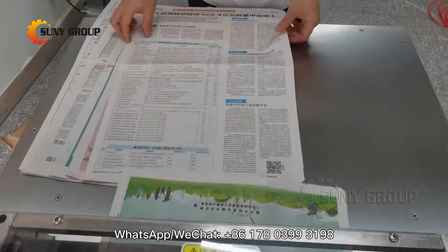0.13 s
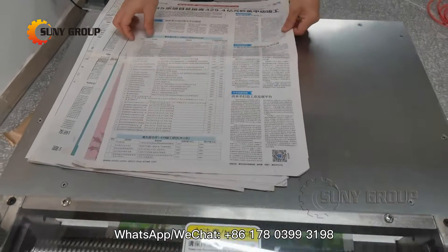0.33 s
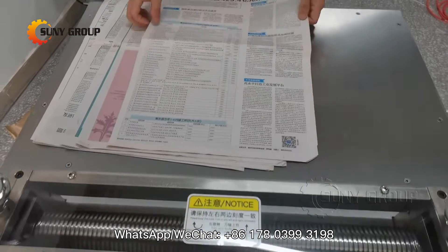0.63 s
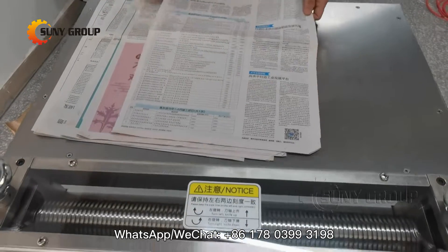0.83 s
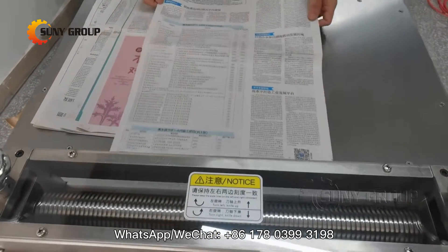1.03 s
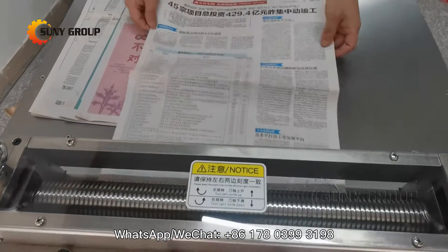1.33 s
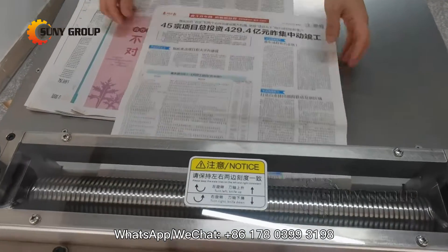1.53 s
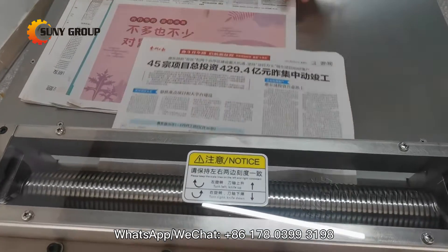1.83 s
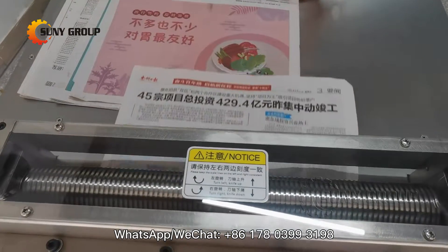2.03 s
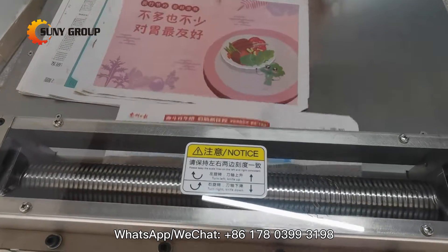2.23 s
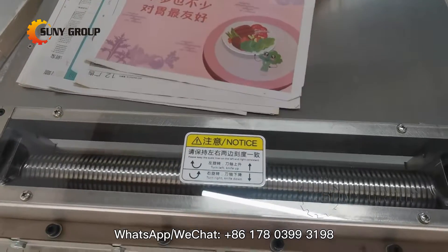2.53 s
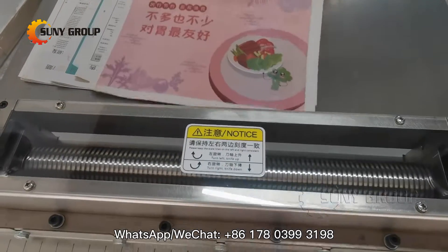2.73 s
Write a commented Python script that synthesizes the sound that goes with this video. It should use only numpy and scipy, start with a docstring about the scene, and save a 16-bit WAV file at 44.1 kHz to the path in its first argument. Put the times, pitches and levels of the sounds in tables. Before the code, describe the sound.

Close stereo pickup of an electric shredder indoors, with steady low drone, gear roar and dull frame thuds; paper rips in a gritty rush, pauses, then rips again, with a few sharp paper snaps.

```python
"""A wide paper shredder runs close by in a workshop, heard by two microphone ports.
The motor hum, a sine at twice the mains frequency, swells within 0.2 s and stays uneven; tones whine beside it.
Tearing, a mix of ticks and hiss, runs to 0.65 s, returns near 1.4 s and fades after 2.7 s; noise bursts snap
near 0.4, 0.8, 2.0 and 2.8 s. Throughout, noise rumbles and thuds in the frame's resonances, shaped noise roars
from the running gear, and a fuzzy sine squeaks faintly in the rollers."""
import sys
import numpy as np
from scipy import signal
from scipy.fft import rfft, irfft, next_fast_len
from scipy.io import wavfile
from scipy.ndimage import uniform_filter1d, map_coordinates

SR = 44100
rng = np.random.default_rng(int(sys.argv[2]) if len(sys.argv) > 2 else 0)


def transcribe(signal):
    """Save signal, clipped to [-1, 1], as a 16-bit WAV file at the path in sys.argv[1]."""
    frames = np.atleast_2d(signal).T
    limited = np.clip(frames, -1, 1)
    pcm = np.round(limited * 32767).astype(np.int16)
    wavfile.write(sys.argv[1], SR, pcm)


N = 127890
T_S = np.arange(N) / SR


def amp(db):
    """dB to gain."""
    return 10 ** (np.asarray(db) / 20)


def unit(x):
    """Scaled to rms 1."""
    return x / np.sqrt(np.mean(x ** 2) + 1e-20)


def along(points, hz):
    """Interpolates (Hz, value) points on a log frequency axis."""
    f, v = np.transpose(points)
    return np.interp(np.log(hz + 1), np.log(f + 1), v)


def curves(rows):
    """One value per sample for each column after the time."""
    s, *cols = np.transpose(rows)
    return [np.interp(T_S, s, c) for c in cols]


def wobble(knots_per_s):
    """A smooth random curve through normal-distributed knots."""
    knots = rng.standard_normal(int(N * knots_per_s / SR) + 4)
    return map_coordinates(knots, [np.arange(N) * knots_per_s / SR])


def filtered(x, response):
    """x times a complex response of frequency, zero-padded against wrap-around."""
    m = next_fast_len(N + SR // 2)
    hz = np.fft.rfftfreq(m, 1 / SR)
    return irfft(rfft(x, m) * response(hz), m)[..., :N]


def resonances(table):
    """Response of (Hz, width Hz, dB) resonances; dB is the rms each passes from unit noise."""
    def response(f):
        total = 0
        for k, (centre_hz, width_hz, db) in enumerate(table):
            gain = amp(db) * np.sqrt(SR / (np.pi * width_hz))
            damping = 1j * f * width_hz
            # alternating signs
            total = total + (-1) ** k * gain * damping / (centre_hz ** 2 - f * f + damping)
        return total
    return response


# Left-right likeness of the noise. Each row: frequency in Hz, correlation (0 to 1).
LIKENESS = [(60, 1), (130, 0.97), (290, 0.93), (500, 0.8), (800, 0.63), (1200, 0.0073), (1600, 0.025),
            (15000, 0)]


def spread(pair, response):
    """Two unrelated signals coloured and mixed to a left-right pair, alike in the bass."""
    def mid_side(hz):
        turn = np.arccos(np.clip(along(LIKENESS, hz), -1, 1)) / 2
        return response(hz) * np.array([np.cos(turn), np.sin(turn)])
    mid, side = filtered(pair, mid_side)
    return np.array([mid + side, mid - side])


def patchy(depth_db):
    """Two noises whose gain varies randomly in shared patches of time and frequency."""
    z = signal.stft(rng.standard_normal((2, N)), nperseg=512)[2]
    field = uniform_filter1d(rng.standard_normal(z.shape[1:]), size=3, axis=0)
    field = uniform_filter1d(field, size=12, axis=1)
    return unit(signal.istft(z * amp(depth_db * unit(field)), nperseg=512)[1][:, :N])


# Motor hum. Each row: time in seconds, rms level in dB before smoothing.
HUM_LEVEL = [(0.0, -32), (0.03, -15), (0.16, -11.5), (0.25, -14.5), (0.7, -14.5), (0.8, -18), (0.83, -14.5),
             (0.88, -19.5), (0.93, -13), (0.96, -18), (1.03, -17), (1.06, -26), (1.09, -16.5),
             (1.39, -14.5), (1.42, -25), (1.44, -19), (1.63, -10.5), (1.75, -17.5), (1.85, -13),
             (1.89, -19.5), (1.92, -12.5), (1.98, -16.5), (2.03, -10), (2.07, -14.5), (2.1, -11),
             (2.16, -14), (2.56, -12.5), (2.75, -18), (2.88, -12)]
# Hum flutter: narrow noise bands beside the hum.
# Each row: frequency in Hz, width in Hz, level in dB before narrowing.
HUM_FLUTTER = [(93.9, 6.3, -32), (116.46, 16.2, -29.5), (131.7, 2.7, -42)]
# Shaft, mains and gear tones. Each row: frequency in Hz, mean rms level in dB.
WHINE_TONES = [(42.5, -37.5), (57.5, -40.5), (200, -40.5), (242.4, -52.5), (484.8, -43.5), (678, -53),
               (729, -55), (969, -58)]
HUM_HZ, HUM_START_RAD, HUM_SMOOTH_SAMPLES = 99.96, 4.6, 900
WHINE_SWAY_DB, WHINE_SWAY_S = 1.5, .00025  # level, timing


def motor():
    """A sine hum of uneven level flutters with narrow noise beside it; shaft and gear tones sway."""
    level = amp(uniform_filter1d(curves(HUM_LEVEL)[0], size=HUM_SMOOTH_SAMPLES))
    hum = np.sqrt(2) * level * np.sin(2 * np.pi * HUM_HZ * T_S + HUM_START_RAD)

    def steep(f):
        total = 0
        for centre_hz, width_hz, db in HUM_FLUTTER:
            damping = 2j * f * width_hz  # second stage, twice as wide, steepens the skirts
            second = damping / (centre_hz ** 2 - f * f + damping)
            total = total + resonances([(centre_hz, width_hz, db)])(f) * second
        return total

    flutter = unit(level) * filtered(rng.standard_normal(N), steep)
    whine = np.zeros(N)
    for hz, db in WHINE_TONES:
        gain = np.sqrt(2) * amp(db + WHINE_SWAY_DB * wobble(5.74))
        swayed_s = T_S + WHINE_SWAY_S * wobble(12)
        whine += gain * np.sin(2 * np.pi * hz * swayed_s + rng.uniform(0, 2 * np.pi))
    return hum + flutter + whine


# Tearing while a sheet is in the cutters. Each row: time in seconds, level in dB before TEAR_LIFT_DB.
SHEET_LEVEL = [(0, -38.5), (.09, -39.5), (.33, -39.5), (.38, -37.5), (.46, -36.5), (.49, -39), (.63, -39.5),
               (.665, -45), (.73, -54), (1.32, -54), (1.36, -43), (1.39, -38.5), (1.43, -37.5), (1.52, -40),
               (1.8, -38.5), (1.95, -38), (2.3, -38), (2.63, -39), (2.69, -39), (2.72, -48), (2.79, -47),
               (2.88, -52)]
# Tearing colour. Each row: frequency in Hz, relative density in dB per Hz before the bass cut.
TEAR_COLOUR = [(410, -26), (700, 8.5), (767, -2), (840, -1.5), (908, -1.5), (957, -2.5), (1590, -10),
               (1860, -9.5), (2780, -12), (3700, -10), (5840, -11.5), (7670, -15.5), (9830, -23),
               (12600, -16.5), (15700, -17.5)]
FIBRES_PER_S, FIBRE_SPREAD_DB, FIBRE_POWER_SHARE = 8000, 3, .4
TEAR_LIFT_DB, TEAR_SWAY_DB, BASS_CUT_HZ = 3.5, .25, 900


def cutters():
    """Fibres part in a dense hail of tiny ticks mixed with hiss."""
    size = amp(FIBRE_SPREAD_DB * rng.standard_normal((2, N))) * rng.choice([-1, 1], size=(2, N))
    ticks = unit(size * (rng.random((2, N)) < FIBRES_PER_S / SR))
    hiss = patchy(depth_db=2.0)
    source = np.sqrt(FIBRE_POWER_SHARE) * ticks + np.sqrt(1 - FIBRE_POWER_SHARE) * hiss

    def colour(hz):
        bass_cut = hz ** 2 / (hz ** 2 + BASS_CUT_HZ ** 2)
        return amp(along(TEAR_COLOUR, hz)) * bass_cut

    tear = unit(spread(source, colour))
    return amp(curves(SHEET_LEVEL)[0] + TEAR_LIFT_DB + TEAR_SWAY_DB * wobble(16)) * tear


# Paper snaps. Each row: start in seconds, level in dB before SNAP_LIFT_DB and the rise, brightness in dB.
PAPER_SNAPS = [(.3782, -26, -3), (.3905, -26, -5), (.4408, -30, -3), (.779, -38, -4), (1.99, -33, -12),
               (2.008, -32, 3), (2.0364, -32, -8), (2.045, -33, -6), (2.7916, -38, -6)]
# Sheet resonances. Each row: frequency in Hz, width in Hz, relative level in dB.
SHEET_RESONANCES = [(1310, 490, -4), (2150, 840, 5.5), (3350, 580, -2.5), (5830, 1300, -5)]
SNAP_T60_S, SNAP_RISE_S, SNAP_LIFT_DB = .016, .0006, 2


def snaps():
    """Creases snap: short noise bursts in the sheet's resonances, the top one set by brightness."""
    dull = unit(spread(rng.standard_normal((2, N)), resonances(SHEET_RESONANCES[:-1])))
    bright = unit(spread(rng.standard_normal((2, N)), resonances(SHEET_RESONANCES[-1:])))
    out = np.zeros((2, N))
    for start_s, db, bright_db in PAPER_SNAPS:
        u = np.clip(T_S - start_s, 0, 1)
        decay = amp(db + SNAP_LIFT_DB - 60 * u / SNAP_T60_S)
        rise = 1 - np.exp(-u / SNAP_RISE_S)
        out += decay * rise * (dull + amp(bright_db) * bright)
    return out


CASING_DB, CASING_SPACING_HZ = 1.5, 50


def casing():
    """Many small casing resonances: a fine uneven response, different at each port."""
    knots = rng.standard_normal((2, int(SR / 2 / CASING_SPACING_HZ) + 4))

    def response(hz):
        ripple = np.array([map_coordinates(k, [hz / CASING_SPACING_HZ]) for k in knots])
        return amp(CASING_DB * ripple)
    return response


# Steel frame resonances. Each row: frequency in Hz, width in Hz, rms level in dB without jolts.
FRAME_RESONANCES = [(72.5, 13, -38.5), (148, 7.5, -44), (160.5, 7.1, -37), (216, 23, -42),
                    (268.3, 8.5, -43.5), (284.4, 11, -44.5), (307, 8.6, -49.5), (352.3, 15.6, -46),
                    (421.2, 13.5, -43), (441, 40, -46), (520, 47, -49), (623, 9.5, -51.5),
                    (703, 110, -51.5), (827, 80, -55.5), (1174, 43, -64.5), (1308, 45, -57),
                    (1463, 25, -57.5)]
# Frame jolts. Each row: start in seconds, nominal strength in dB over the rumble.
FRAME_JOLTS = [(.14, 5), (0.432, 10.5), (.47, 2), (.56, 3.5), (.65, 4.5), (.73, 5), (0.841, 9), (0.948, 13),
               (1.58, 9.5), (1.89, 6.5), (2.03, 6.5), (2.31, 7.5), (2.52, 7), (2.79, 10.5)]
THUD_RISE_S, THUD_FALL_S = .01, .045
JOLT_HZ = 352  # jolts reach mainly the lower resonances


def frame():
    """Noise shakes the frame's resonances, harder at each jolt."""
    jolts = np.zeros(N)
    for start_s, db in FRAME_JOLTS:
        u = np.clip(T_S - start_s, 0, None)
        pulse = 2 * (1 - np.exp(-u / THUD_RISE_S)) * np.exp(-u / THUD_FALL_S)
        jolts += (amp(db) - 1) * pulse
    shake = patchy(depth_db=2.5)
    shake = shake + filtered(jolts * shake, lambda hz: 1 / (1 + (hz / JOLT_HZ) ** 2))
    return spread(shake, resonances(FRAME_RESONANCES))


# Running gear colour. Each row: frequency in Hz, relative density in dB per Hz.
GEAR_COLOUR = [(30, -25), (48, -6), (70, -17.5), (100, -12.5), (130, -14), (160, -22), (325, -24),
               (480, -21), (680, -33), (1030, -32), (1500, -36), (2100, -38), (3000, -43.5), (3700, -39.5),
               (4800, -51), (6000, -44.5), (7500, -54.5), (9800, -57.5), (12500, -50.5), (15700, -53)]
GEAR_DB = -35


def running_gear():
    """A broad roar: patchy noise shaped to the gear's spectrum."""
    roar = unit(spread(patchy(depth_db=.8), lambda hz: amp(along(GEAR_COLOUR, hz))))
    return amp(GEAR_DB) * roar


# Roller squeak. Each row: time in seconds, frequency in Hz, level in dB before the fuzz.
ROLLER_SQUEAK = [(0, 11500, -64), (.7, 11500, -66), (.82, 11500, -58), (.85, 11550, -59), (.87, 12100, -58),
                 (.91, 12150, -55), (.95, 11800, -56), (1.02, 11450, -57), (1.12, 11500, -65),
                 (1.3, 11500, -60), (2, 11500, -60), (2.35, 11500, -53), (2.7, 11500, -62),
                 (2.9, 11500, -56)]
FUZZ_KNOTS_PER_S = 300


def rollers():
    """A faint, very high sine squeak, made fuzzy by random gain at each port."""
    hz, db = curves(ROLLER_SQUEAK)
    fuzz = np.array([wobble(FUZZ_KNOTS_PER_S), wobble(FUZZ_KNOTS_PER_S)])
    return amp(db) * fuzz * np.sin(2 * np.pi * np.cumsum(hz) / SR)


def scene():
    """The machine's sources summed; the casing colours only tearing and snaps."""
    paper = filtered(cutters() + snaps(), casing())
    return motor() + paper + frame() + running_gear() + rollers()


# Port balance. Each row: frequency in Hz, left over right in dB.
LEFT_OVER_RIGHT = [(60, 1.5), (99, 0.5), (160, 2), (270, 2.5), (450, 4.5), (740, 4), (1220, 4.5), (2010, 4),
                   (3330, 2), (5500, 6.5), (9080, 0.5), (15000, -1)]
TOP_HZ = 15740


def record(dry):
    """The left port hears more of the middle range; nothing passes above the band limit."""
    def ports(hz):
        balance_db = np.outer([.5, -.5], along(LEFT_OVER_RIGHT, hz))
        return amp(balance_db) * (hz < TOP_HZ)
    return filtered(dry, ports)


dry = scene()
out = record(dry)
transcribe(out)
```